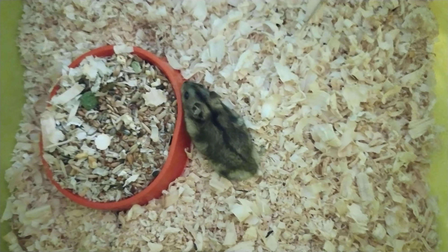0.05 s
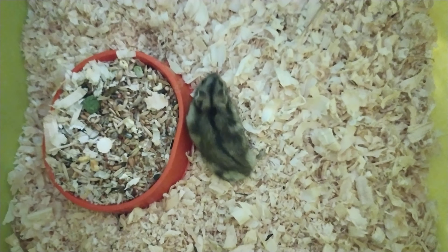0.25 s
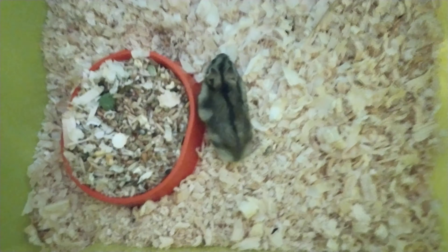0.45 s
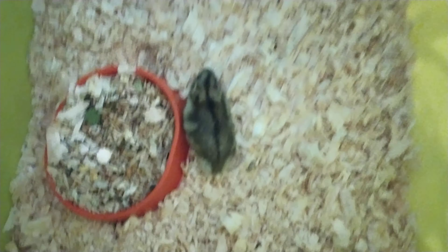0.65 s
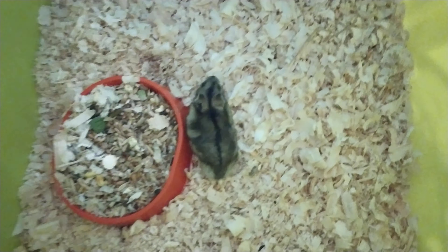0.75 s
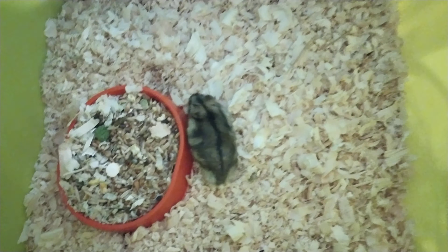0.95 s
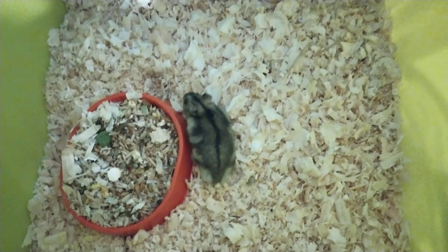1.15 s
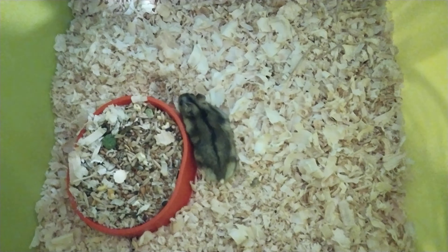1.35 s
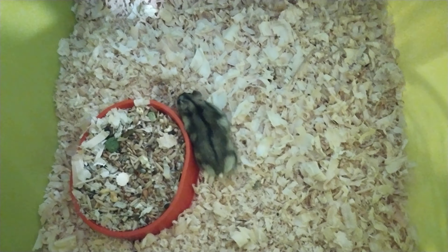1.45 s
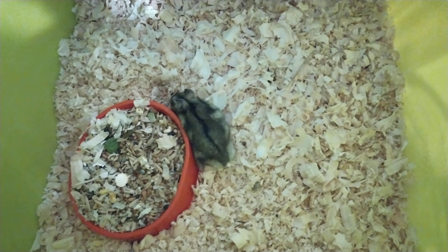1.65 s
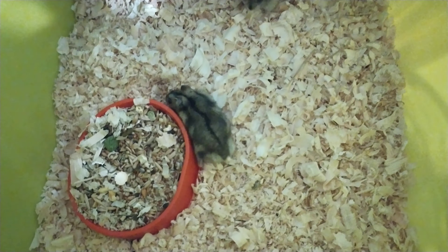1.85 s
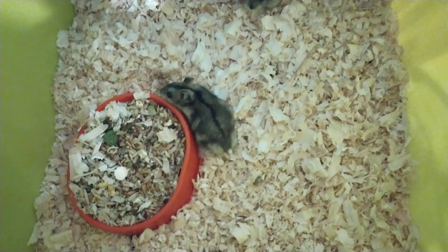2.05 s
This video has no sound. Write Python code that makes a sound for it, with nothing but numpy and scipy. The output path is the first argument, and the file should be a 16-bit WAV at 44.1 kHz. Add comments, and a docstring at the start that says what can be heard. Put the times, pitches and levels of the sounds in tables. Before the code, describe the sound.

A hamster scurries through wood shavings in a plastic cage, heard very close in stereo. Rapid soft thumps and dry crunches start at once; a very sharp, loud knock hits the left at 0.24 s. Weaker knocks, a brief claw scrape and bright snaps cluster around 0.42-0.6 s. Quick steps resume from 0.72 to 1.05 s, then sparse, light, dull steps and faint crackle continue to about 2.1 s over low hum.

```python
"""Hamster paws scurry over wood shavings in a plastic cage, close to a stereo pair, then slow to light steps.
Each paw crunches shavings (random grains) and rings the cage floor (noise shaped by modes that decay).
Fine crackle and low drumming fill the gaps; shavings snap and splinter in bright noise bursts.
Hard knocks, one very sharp, reach the nearby left microphone through thin plastic, treble first.
A claw scrape, soft low swells and deep rumble join them, over faint air noise and a steady hum."""
import sys
import numpy as np
from scipy import signal
from scipy.fft import rfft, irfft
from scipy.io import wavfile
from scipy.ndimage import uniform_filter1d

SR = 44100
rng = np.random.default_rng(int(sys.argv[2]) if len(sys.argv) > 2 else 0)


def inscribe(sig):
    """Save sig as 16-bit PCM at rate SR to the path in sys.argv[1].

    A 1-D sig is mono; a 2-D sig holds one channel per row.
    Samples are clipped to [-1, 1] before scaling.
    """
    pcm = np.round(np.clip(np.atleast_2d(sig).T, -1, 1) * 32767)
    wavfile.write(sys.argv[1], SR, pcm.astype(np.int16))


N = 92610  # 2.1 s


def amp(db):
    """Decibels to gain."""
    return 10 ** (np.asarray(db) / 20)


def unit(x):
    """Scales to rms 1."""
    return x / np.sqrt(np.mean(x ** 2) + 1e-20)


def read(points, hz, axis=1):
    """Reads a column of a table on a log-frequency axis."""
    table = np.transpose(points)
    return np.interp(np.log(hz + 1), np.log(table[0] + 1), table[axis])


def level(points):
    """Gain over time from (t/s, level/dB) points."""
    return amp(np.interp(np.arange(N) / SR, *np.transpose(points)))


def add(mix, s, sound):
    """Mixes a stereo sound in at time s."""
    part = mix[:, max(round(s * SR), 0):][:, :sound.shape[1]]
    part += sound[:, :part.shape[1]]


def sides(right_db):
    """Gains of the left and right microphones."""
    return np.array([[1], [amp(right_db)]])


def coloured(x, colour):
    """Filters by a function from Hz to dB; the left side gets rms 1, the right keeps its balance to it."""
    size = x.shape[-1]
    hz = np.fft.rfftfreq(size, 1 / SR)
    y = irfft(rfft(x) * amp(colour(hz)), size)
    return y / np.sqrt(np.mean(y[0] ** 2) + 1e-20)


def noise_pair(size, likeness):
    """Two partly alike noises with an even spectrum."""
    a, b = irfft(np.exp(2j * np.pi * rng.random((2, size // 2 + 1))), size)
    shared = np.clip(likeness, 0, 1)
    return np.array([a, shared * a + np.sqrt(1 - shared * shared) * b])


def hump(hz, centre_hz, octaves):
    """A rounded band in dB."""
    return -20 * np.log10(1 + (np.log2((hz + 1) / centre_hz) / octaves) ** 2)


# Paw steps on the cage floor: [t/s, thump level/dB, crunch level/dB]
PAW_STEPS = [(0.003, -57.5, -60), (0.032, -51.5, -64), (0.052, -36, -51.5), (0.126, -45, -59),
             (0.162, -42.5, -52.5), (0.187, -40.5, -50.5), (0.216, -38, -65), (0.274, -36, -51.5),
             (0.338, -46.5, -86), (0.376, -47.5, -68), (0.431, -43, -50.5), (0.477, -45.5, -44.5),
             (0.592, -34.5, -56.5), (0.718, -57, -81), (0.751, -36, -53), (0.793, -42.5, -55.5),
             (0.827, -42.5, -53.5), (0.861, -40.5, -51.5), (0.887, -34.5, -49.5), (0.915, -42.5, -49.5),
             (0.973, -53, -71), (1.001, -34, -49), (1.035, -52, -58), (1.183, -56, -61),
             (1.244, -55.5, -76), (1.307, -50, -65), (1.342, -47, -69), (1.402, -54, -68),
             (1.518, -56.5, -56.5), (1.581, -59, -71.5), (1.620, -83, -59), (1.657, -54, -61.5),
             (1.827, -58.5, -64.5), (1.938, -50, -80.5), (1.997, -52, -69.5), (2.076, -59, -56)]
CRUNCH_S, CRUNCH_GRAINS_PER_S = 0.0051, 7400  # decay time constant, mean grain rate


def paws(size=4096):
    """Each step crushes shavings and thumps the floor."""
    out, t = np.zeros((2, N)), np.arange(size) / SR
    crush = np.minimum(t / 0.00067, 1) * np.exp(-t / CRUNCH_S)
    # makes up for the short envelope, judged over its first eighth
    crush_gain = unit(crush[:size // 8]).max()
    for s, thump_db, crunch_db in PAW_STEPS:
        add(out, s, amp(thump_db) * thump(thump_db))
        crunch = crush_gain * crush * crackle(size, CRUNCH_GRAINS_PER_S)
        add(out, s, amp(crunch_db) * crunch)
    return out


# Broad colour of the cage floor under its modes: [f/Hz, level/dB]
FLOOR_COLOUR = [(30, -6.5), (90, -3.5), (220, 3.5), (450, -4), (800, -8.5), (1400, -12.5), (2500, -18),
                (4500, -27.5), (16000, -63)]
# Time for the floor's ring to fall 60 dB: [f/Hz, t60/s]
FLOOR_DECAY = [(120, 0.13), (280, 0.13), (600, 0.12), (1500, 0.15), (6000, .09)]
CAGE_RIGHT_DB, CAGE_LIKENESS = -4.5, 0.63  # right microphone, how alike both sides are (0-1)
STEP_RISE_S = 0.0052
# light steps sound duller: dB of treble lost per dB below a firm step
FIRM_STEP_DB, DULLING, DULL_ABOVE_HZ = -34, 0.43, 1200


def thump(db, size=16384):
    """The cage floor rings after a paw lands, each pitch band dying at its own rate."""
    dull_db = DULLING * min(db - FIRM_STEP_DB, 0)

    def colour(hz):
        treble = hz ** 4 / (hz ** 4 + DULL_ABOVE_HZ ** 4)
        return read(FLOOR_COLOUR, hz) + cage_peaks(hz) + dull_db * treble

    ring = coloured(noise_pair(size, CAGE_LIKENESS), colour)
    hz, t, z = signal.stft(ring, SR, nperseg=256)
    decay = amp(-60 * t / read(FLOOR_DECAY, hz)[:, None])
    ring = signal.istft(z * decay, SR, nperseg=256)[1]
    ring = ring * np.minimum(np.arange(size) / SR / STEP_RISE_S, 1)
    # rms 1 over the first 23 ms of each side
    return ring / ring[:, :size // 16].std(axis=1, keepdims=True) * sides(CAGE_RIGHT_DB)


# Ringing modes of the cage floor: [f/Hz, width/Hz, lift/dB]
FLOOR_MODES = [(125.5, 7.8, 9), (170.4, 40, 8), (248.8, 39, 10.5), (290.7, 55, 12.5), (385, 53, 5),
               (556, 150, 13), (696, 45, 11.5), (965, 150, 8), (2600, 260, 7)]


def cage_peaks(hz):
    """Lift in dB from the resonant modes of the cage floor."""
    return sum(db / (1 + (2 * (hz - f) / width) ** 2) for f, width, db in FLOOR_MODES)


# Colour of crackling shavings at each microphone: [f/Hz, left level/dB, right level/dB]
SHAVINGS_COLOUR = [(300, -3, -25), (1540, -8, -5.5), (2684, -6.5, -1), (4246, -7.5, -10), (6200, -1, -13.5),
                   (7870, 4, -12), (9500, -1, 0.5), (11500, -8.5, -18.5), (14000, -5.5, -13.5),
                   (16000, -19, -22)]
GRAIN_SPREAD_DB = 2.5  # mean of the random boost per grain, before its cap


def crackle(size, per_s):
    """Tiny fractures of uneven strength, coloured by the shavings."""
    boost_db = GRAIN_SPREAD_DB * np.minimum(rng.exponential(1, size), 5)
    grains = (rng.random(size) < per_s / SR) * amp(boost_db)

    def colour(hz):
        return np.array([read(SHAVINGS_COLOUR, hz, axis=side) for side in (1, 2)])

    return coloured(grains * rng.standard_normal((2, size)), colour)


# Fine crackle between steps, before clumping: [t/s, level/dB]
RUSTLE_LEVEL = [(0, -57.5), (.3, -56.5), (.4, -59.5), (.46, -55.5), (.55, -57.5), (.575, -72), (.73, -68),
                (.79, -59.5), (.85, -62), (.93, -53), (1.03, -58.5), (1.12, -62), (1.45, -62.5),
                (1.63, -59), (1.78, -65), (2.1, -60.5)]
# Low drumming of the floor under the moving body: [t/s, level/dB]
DRUM_LEVEL = [(0, -48.5), (.15, -43.5), (.27, -47), (.36, -48), (.5, -42.5), (.62, -48), (.7, -47.5),
              (.735, -40.5), (.8, -56), (.85, -71), (.93, -47.5), (.985, -55), (1.04, -40), (1.14, -59.5),
              (1.4, -69.5), (1.78, -69), (2.1, -64)]
# Colour of the drumming under the floor modes: [f/Hz, level/dB]
DRUM_COLOUR = [(25, -19), (70, -11.5), (130, -3), (240, -7.5), (400, -26), (1000, -25.5), (3000, -35.5),
               (16000, -68.5)]
RUSTLE_GRAINS_PER_S, CLUMP_DB = 17000, 1.5  # mean grain rate, rms swing of the clumps


def bedding():
    """The body drags through the shavings: fine crackle in uneven clumps over a low drumming."""
    drum = coloured(noise_pair(N, CAGE_LIKENESS), lambda hz: read(DRUM_COLOUR, hz) + cage_peaks(hz))
    swing = unit(uniform_filter1d(rng.standard_normal(N), size=500))
    rustle = amp(CLUMP_DB * swing) * crackle(N, RUSTLE_GRAINS_PER_S)
    return level(RUSTLE_LEVEL) * rustle + level(DRUM_LEVEL) * drum * sides(CAGE_RIGHT_DB)


# Hard knocks by the left microphone:
# [t/s, peak level/dB, low edge f/Hz, high edge f/Hz, top f/Hz, lag at 1 kHz/ms, right side level/dB]
WALL_KNOCKS = [(0.2408, -2.5, 247, 900, 3580, 1.8, -41), (0.4546, -33, 920, 3000, 2660, 1.51, -13),
               (0.4644, -22.5, 850, 2550, 3240, 1.92, -21), (0.5092, -19.5, 427, 1700, 2400, 1.1, -28),
               (0.5221, -35.5, 300, 1200, 3320, 1.93, -43), (0.5313, -35.5, 300, 1300, 2860, 2.01, -35),
               (0.5570, -32, 1800, 3000, 3460, 1.74, -25), (0.5569, -19.5, 140, 330, 765, 1.9, -39)]


def knocks():
    """Single hard taps send bending waves through the thin wall."""
    out = np.zeros((2, N))
    for s, db, low_hz, high_hz, top_hz, lag_ms, right_db in WALL_KNOCKS:
        add(out, s, amp(db) * chirp(low_hz, high_hz, top_hz, lag_ms) * sides(right_db))
    return out


# Ringing modes of the thin wall: [f/Hz, width/Hz, lift as added gain]
THIN_WALL_MODES = [(165, 22, 0.95), (300, 100, 0.4), (900, 260, 0.44)]
LAG_LAW, LAG_LIMIT_HZ = 0.91, 105.7  # lag grows as pitch falls, but no further below the limit
ECHO_S, ECHO_SHARE, ECHO_TOP_HZ = .0021, .33, 1500  # one reflection from the edge of the wall


def chirp(low_hz, high_hz, top_hz, lag_ms, size=8192):
    """Bending waves run faster at high pitch, so a tap arrives as a quick falling chirp of peak 1."""
    hz = np.fft.rfftfreq(size, 1 / SR)
    low_cut = hz ** 2 / np.hypot(hz ** 2, low_hz ** 2)
    band = low_cut / (1 + (hz / high_hz) ** 2) / np.hypot(1, (hz / top_hz) ** 4)
    lag_s = lag_ms / 1000 * (1000 / np.maximum(hz, LAG_LIMIT_HZ)) ** LAG_LAW
    echo = 1 + ECHO_SHARE / (1 + (hz / ECHO_TOP_HZ) ** 2) * np.exp(-2j * np.pi * hz * ECHO_S)
    ring = 1 + sum(lift / (1 + 2j * (hz - f) / width) for f, width, lift in THIN_WALL_MODES)
    # summing the lag over frequency gives the phase that delays each pitch
    travel = np.exp(-2j * np.pi * np.cumsum(lag_s) * hz[1])
    wave = irfft(band * echo * ring * travel)[:size // 2]
    return wave / abs(wave).max()


SCRAPE_START_S, SCRAPE_LENGTH_S, SLIPS_PER_S = .473, .027, 1500
SCRAPE_DB, SCRAPE_RIGHT_DB = -43, -9


def scrape():
    """A claw scrapes the wall: a quick run of uneven slips, each a tiny tap."""
    out, size = np.zeros((2, N)), round(SCRAPE_LENGTH_S * SR)
    slips = (rng.random(N) < SLIPS_PER_S / SR) * rng.standard_normal((2, N))
    slips = slips[:, :size] * np.hanning(size) ** .5
    tap = chirp(low_hz=594, high_hz=2680, top_hz=3900, lag_ms=1.8)
    sound = signal.fftconvolve(slips, tap[None])
    add(out, SCRAPE_START_S, amp(SCRAPE_DB) * sound / sound[0, :size].std() * sides(SCRAPE_RIGHT_DB))
    return out


# Snapping shavings: [t/s, peak level/dB, centre f/Hz, right side level/dB]
SHAVING_SNAPS = [(0.1336, -34.5, 10200, -5), (0.2208, -32.5, 8360, -25), (0.2395, -27, 7500, -33),
                 (0.454, -21.5, 10200, -28), (0.4653, -25, 8650, -29), (0.5087, -22.5, 9440, -39),
                 (0.5153, -50, 11000, -20), (0.5214, -36, 10400, -22), (0.5565, -31.5, 9100, -31),
                 (0.6060, -35, 10800, -32), (0.7072, -41.5, 10300, -24), (0.9063, -24.5, 7870, -15),
                 (1.002, -34.5, 7760, -22), (2.0785, -42.5, 12750, -3)]
SNAP_RISE_S, SNAP_S, SNAP_OCTAVES = .0003, .0004, .24
SNAP_TAIL_S, SNAP_TAIL_DB = .002, -16


def snaps(size=1024):
    """Single shavings break with a bright tick and a short splintering tail."""
    out, t = np.zeros((2, N)), (np.arange(size) - size // 2) / SR
    after = np.maximum(t, 0)
    rise = np.exp((t - after) / SNAP_RISE_S)
    fade = rise * (np.exp(-after / SNAP_S) + amp(SNAP_TAIL_DB) * np.exp(-after / SNAP_TAIL_S))
    for s, db, centre_hz, right_db in SHAVING_SNAPS:
        burst = fade * np.sign(rng.standard_normal((2, size)))
        tick = coloured(burst, lambda hz: hump(hz, centre_hz, SNAP_OCTAVES))
        tick = tick / abs(tick).max(axis=1, keepdims=True)
        add(out, s + t[0], amp(db) * tick * sides(right_db))
    return out


# Splintering shavings, level before the swell:
# [t/s, length/s, level/dB, centre f/Hz, right side level/dB]
SPLINTER_BURSTS = [(0.422, 0.034, -48.5, 11700, -2.5), (0.4756, 0.025, -45.5, 9400, -26),
                   (0.505, 0.0099, -49, 9800, -20), (0.5500, 0.007, -65, 10000, -12),
                   (0.5888, 0.015, -44, 10300, -28)]
SPLINTER_OCTAVES = .32


def splinters(size=4096):
    """Dense bright fractures that swell quickly and die away."""
    out, t = np.zeros((2, N)), np.arange(size) / SR
    for s, length, db, centre_hz, right_db in SPLINTER_BURSTS:
        fractures = rng.standard_normal((2, size)) * rng.exponential(1, size)
        grains = coloured(fractures, lambda hz: hump(hz, centre_hz, SPLINTER_OCTAVES))
        swell = np.sin(np.pi * np.minimum(t / length, 1) ** 0.79)
        add(out, s, amp(db) * grains * swell * sides(right_db))
    return out


# The body leans on the floor, level before the swell: [t/s, length/s, level/dB]
BODY_LEANS = [(0.125, .09, -45.5), (0.715, 0.12, -39.5)]
LEAN_HZ, LEAN_OCTAVES = 140.2, 0.16


def leans(size=16384):
    """Slow pushes on the floor stir a narrow low band of noise in a soft swell."""
    out, t = np.zeros((2, N)), np.arange(size) / SR
    for s, length, db in BODY_LEANS:
        push = coloured(noise_pair(size, 1.0), lambda hz: hump(hz, LEAN_HZ, LEAN_OCTAVES))
        swell = np.sin(np.pi * np.minimum(t / length, 1))
        add(out, s, amp(db) * push * swell * sides(CAGE_RIGHT_DB))
    return out


# Deep rumble of movement: [t/s, level/dB]
RUMBLE_LEVEL = [(0, -53), (.2, -45), (.35, -51), (.6, -53), (.7, -59), (.95, -53.5), (1.2, -67),
                (1.45, -55), (1.6, -71.5), (2.1, -62.5)]
# Colour of the rumble: [f/Hz, level/dB]
RUMBLE_TONE = [(15, 1.5), (30, -2), (65, -1.5), (100, -8.5), (200, -27.5), (1000, -63)]


def rumble():
    """Deep, soft shaking of the cage as the animal moves: low noise, much alike on both sides."""
    shaking = coloured(noise_pair(N, .85), lambda hz: read(RUMBLE_TONE, hz))
    return level(RUMBLE_LEVEL) * shaking * sides(right_db=-8.5)


# Colour of the still room air: [f/Hz, level/dB]
AIR_COLOUR = [(20, -4.5), (50, 0.5), (85, -21.5), (250, -10), (600, -9.5), (1400, -23.5), (2000, -24.5),
              (2600, -16), (3300, -27), (4200, -22.5), (9000, -28.5), (16000, -31.5)]
AIR_DB, AIR_RIGHT_DB, HUM_HZ, HUM_DB = -66, -1, 48, -64


def room():
    """Faint air noise and a steady low hum."""
    air = coloured(noise_pair(N, 0.23), lambda hz: read(AIR_COLOUR, hz))
    hum = np.sqrt(2) * np.sin(2 * np.pi * HUM_HZ * np.arange(N) / SR)
    return (amp(AIR_DB) * air + amp(HUM_DB) * hum) * sides(AIR_RIGHT_DB)


def scene():
    """Everything in the cage, over the room."""
    steps = paws() + bedding() + rumble()
    wall = knocks() + scrape()
    return steps + wall + splinters() + leans() + snaps() + room()


def record(dry):
    """The recorder's band limit at 16 kHz."""
    low_pass = signal.firwin(511, 16000, window=("kaiser", 9), fs=SR)
    return signal.oaconvolve(dry, low_pass[None], "same")


dry = scene()
out = record(dry)
inscribe(out)
```